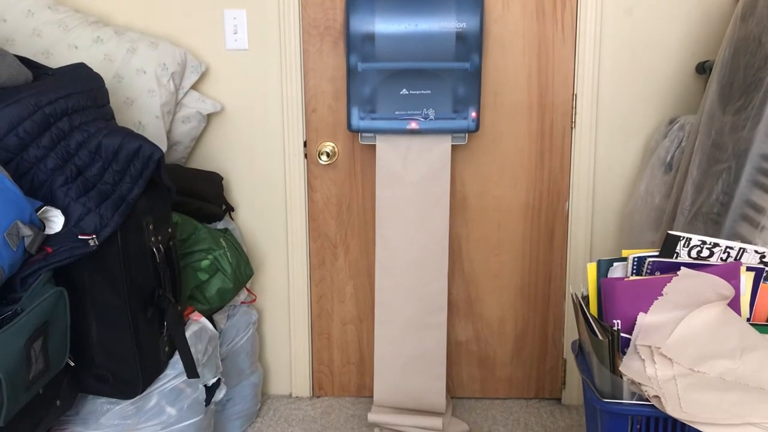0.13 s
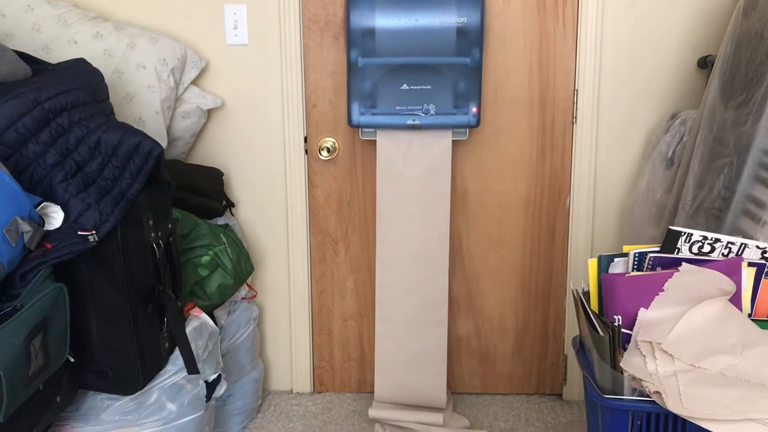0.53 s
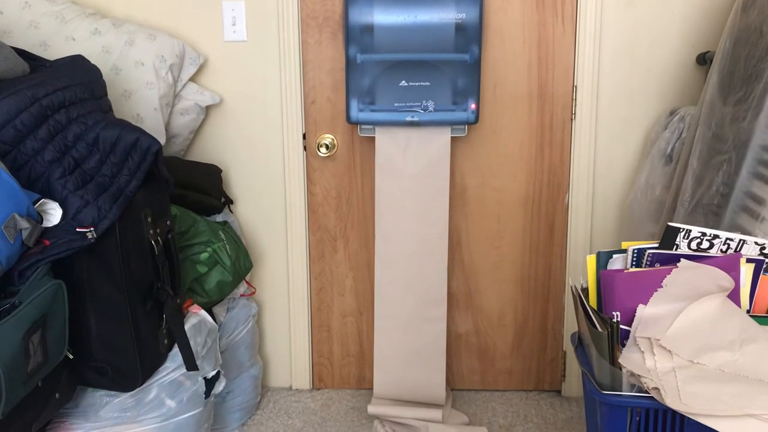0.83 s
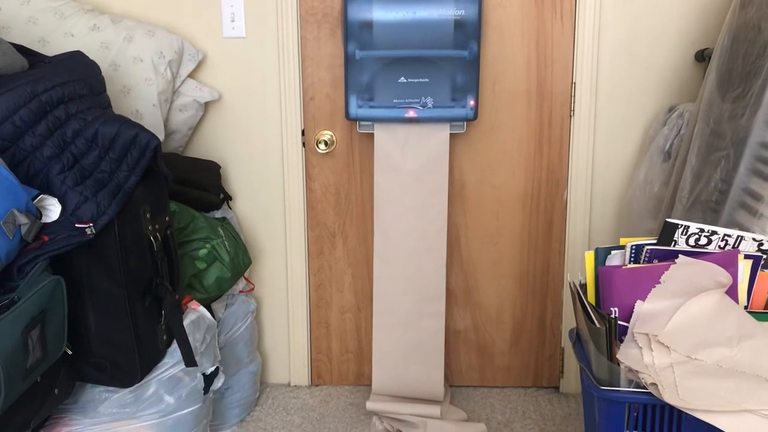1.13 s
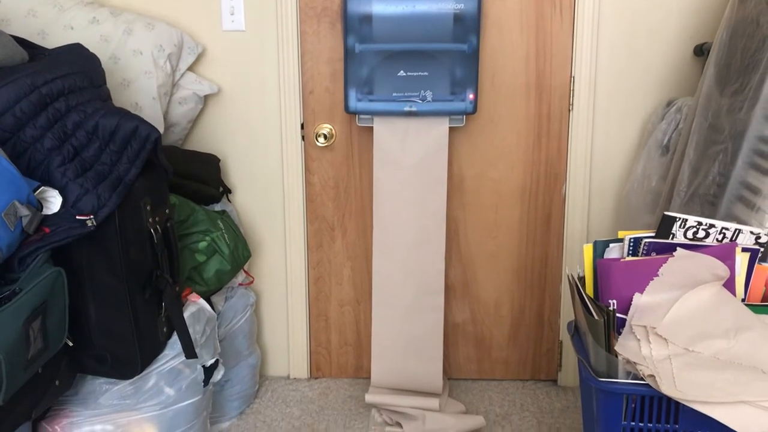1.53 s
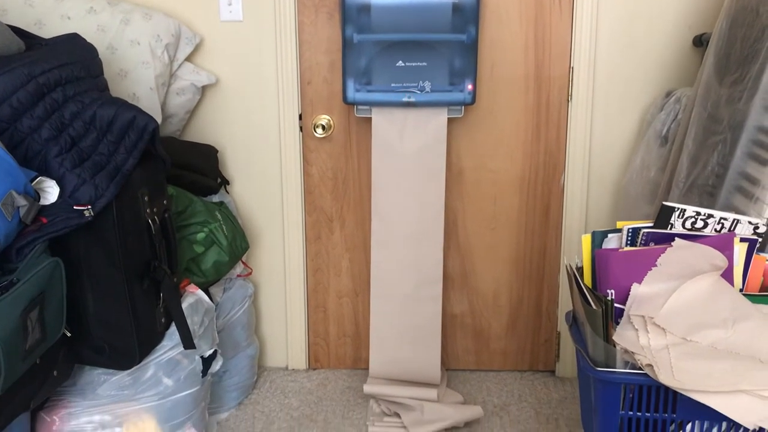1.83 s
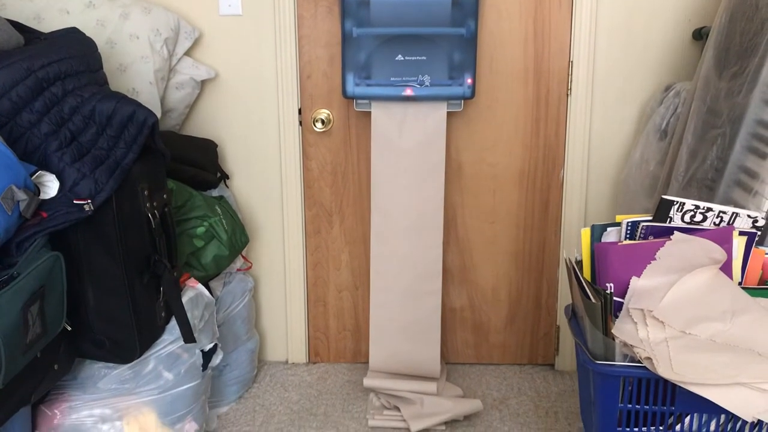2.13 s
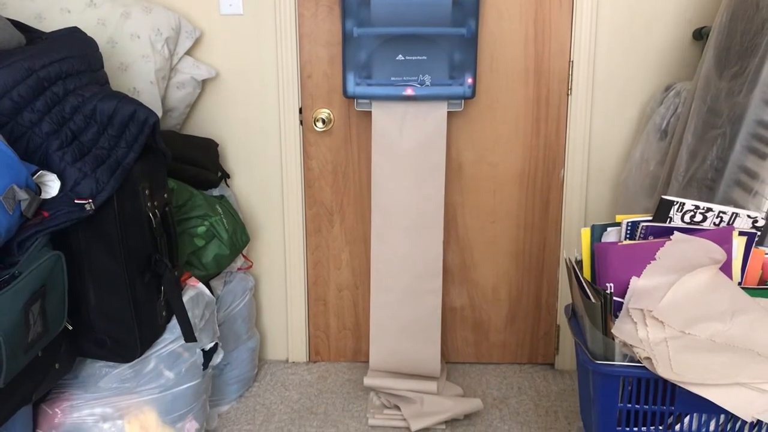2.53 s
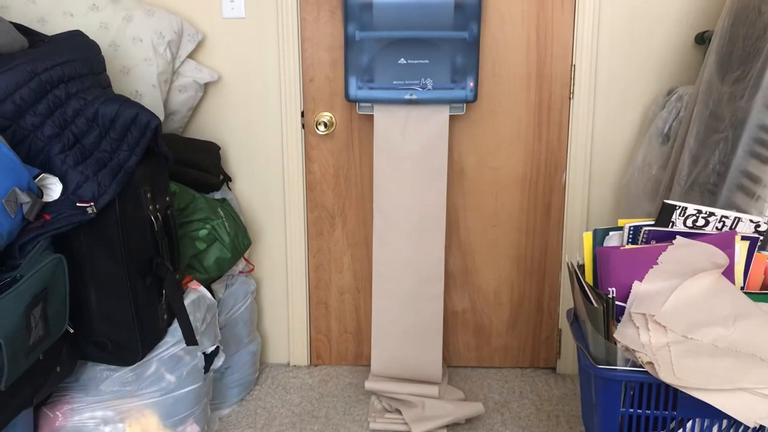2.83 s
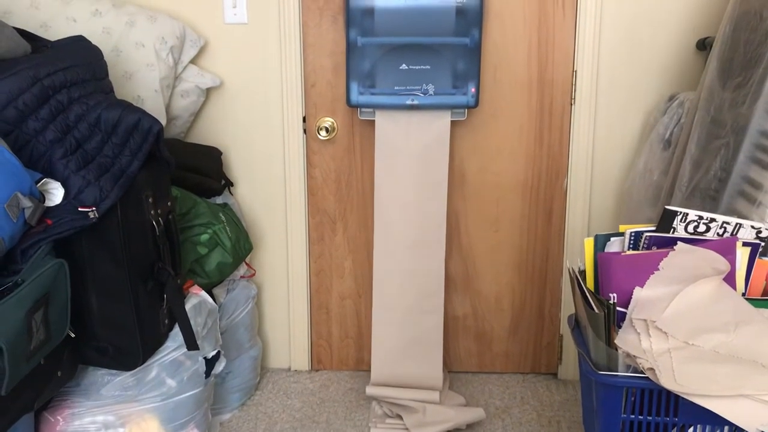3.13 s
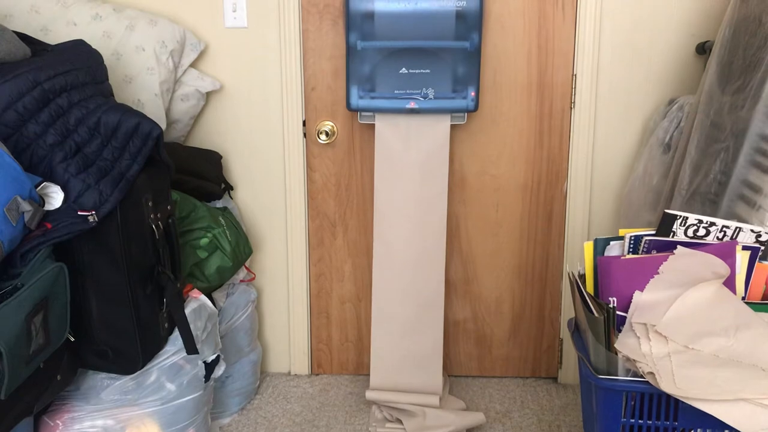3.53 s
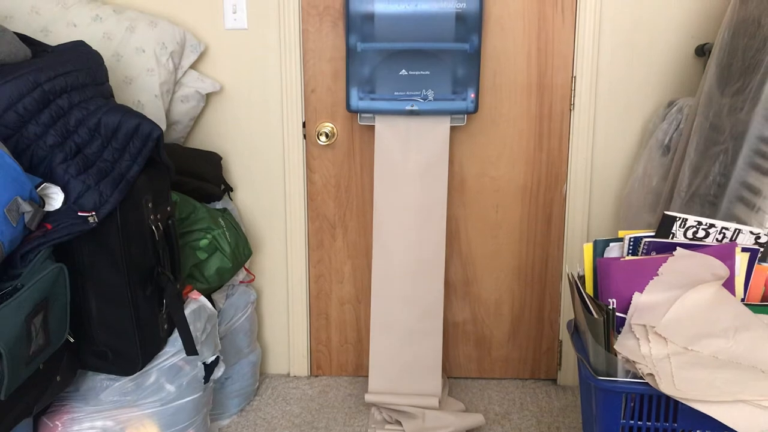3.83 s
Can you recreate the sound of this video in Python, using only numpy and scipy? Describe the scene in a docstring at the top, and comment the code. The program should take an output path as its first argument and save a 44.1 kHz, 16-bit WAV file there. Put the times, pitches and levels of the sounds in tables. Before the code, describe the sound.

A motorized paper towel dispenser whirs to life after a stretch of faint room hiss. Its gears grind and rattle while paper crackles lightly and the plastic case clacks against a door, in a furnished room with little echo.

```python
"""An automatic paper towel dispenser on a wooden door in a quiet bedroom. At first there is only room tone
and a faint mains hum. At 2.6 s the small motor spins up: periodic tooth contact makes the gears whine and
grind, the plastic case resonates, and the shaft hums. From 2.8 s loose gear teeth rattle and the paper
crackles as it feeds. From 3.1 s the roller thumps the door three times and the case clacks. The furnished
room answers each sound with a short, dull reverberation."""
import sys
import numpy as np
from scipy import signal
from scipy.fft import rfft, irfft, next_fast_len
from scipy.io import wavfile
from scipy.ndimage import map_coordinates

SR = 44100
rng = np.random.default_rng(int(sys.argv[2]) if len(sys.argv) > 2 else 0)


def persist_wave(psi):
    """Save psi, clipped to +-1, as 16-bit WAV."""
    counts = np.round(np.clip(psi, -1, 1) * 32767).astype(np.int16)
    wavfile.write(sys.argv[1], SR, np.atleast_2d(counts).T)


N = 176400
T = np.arange(N) / SR

# Spectrum of room tone and microphone hiss: frequency_hz, gain_db
AIR_SPECTRUM = [(12, -42), (20, -16), (30, -14), (44, -5), (60, 0), (78, -4.5), (98, -3), (115, -11.5),
                (149, -5.5), (259, -12), (320, -12.5), (430, -19), (687, -22), (2000, -28), (4500, -32),
                (8000, -35), (17000, -36.5)]
# Loudness of the gear train, grinding and whine together: time_s, level_db
GEAR_LEVELS = [(2.62, -72), (2.67, -66), (2.708, -48), (2.73, -51.5), (2.76, -46), (2.9, -46.5),
               (3.05, -47), (3.12, -45.5), (3.25, -44.5), (3.3, -47), (3.42, -45), (3.6, -46.5),
               (3.75, -45), (3.9, -45.5), (4, -46)]
# Tooth rate and whine harmonics relative to the gear level:
# time_s, tooth_hz, first_db, second_db, third_db, fourth_db
GEAR_MESH = [(2.62, 330, -31, -20, -27, -25), (2.72, 369, -20, -9.5, -15, -24),
             (2.8, 404.4, -19, -4, -7, -7), (2.9, 422.7, -13, -10, -15, -6),
             (2.98, 434.8, -18, -2, -23, -7.5), (3.07, 441, -21.5, -11, -11, -6),
             (3.2, 444.3, -23, -14, -25, -7.5), (3.28, 438.4, -5, -10, -30, -8),
             (3.35, 441, -47, -10, -19.5, -10), (3.43, 444.5, -9, -20, -13.5, -5),
             (3.49, 428.3, -10, -23, -14, -18), (3.55, 420.5, -15, -3.5, -16, -11),
             (3.65, 415.8, -16, -15, -18, -13), (3.75, 426.2, -12, -15, -10.5, -14),
             (3.87, 435.7, -8, -6, -18, -3.5), (3.94, 432.7, -11, -18, -12.5, -13),
             (4, 437.3, -21, -18, -13, -8)]
# Loudness of the shaft hum: time_s, level_db
SHAFT_LEVELS = [(2.66, -84), (2.7, -64), (2.786, -59), (2.838, -48.5), (2.98, -49.5), (3.036, -68),
                (3.13, -51), (3.182, -75), (3.234, -58.5), (3.428, -51.5), (3.626, -58), (3.682, -71),
                (3.86, -55.5), (4.0, -59)]
# Broad response of the plastic case: frequency_hz, gain_db
CASE_SPECTRUM = [(120, -6), (200, -10), (364, -9), (504, -9), (843, -3.5), (930, -6), (1020, 1), (1230, -6),
                 (1700, -1), (2440, -8.5), (3100, -11), (3400, -16), (5500, -22), (6500, -28), (9500, -31),
                 (11500, -40), (17000, -40)]
# Resonances of the case, and one dip: centre_hz, width_hz, gain_db
CASE_MODES = [(300, 40, 5.5), (439, 22, 8), (651, 38, 5.5), (723, 26, 6), (1009, 36, 4), (1136, 36, 5),
              (1287, 91, 5), (1400, 20, 2), (1538, 22, 3), (1640, 66, 3.5), (1800, 47, 1.5), (2130, 42, 4),
              (2350, 55, 3), (2720, 69, 2.5), (2967, 156, 6.5), (4080, 100, 5.5), (4450, 83, 5.5),
              (5260, 99, 3), (5520, 91, -4), (6230, 69, 1), (6930, 90, 5), (8170, 150, 7)]
# Impacts of loose gear teeth: start_s, level_db
GEAR_RATTLES = [(2.7854, -65), (2.8026, -47.5), (2.9452, -50), (3.0145, -49.5), (3.0874, -52.5),
                (3.0984, -44.5), (3.252, -48.5), (3.2907, -51.5), (3.3164, -50), (3.3624, -50.5),
                (3.4154, -50), (3.5145, -58), (3.5471, -43.5), (3.63, -48), (3.6516, -50.5), (3.713, -44),
                (3.7823, -57), (3.8152, -54), (3.875, -41), (3.9092, -51.5), (3.935, -49.5)]
# Spectrum of those impacts: frequency_hz, gain_db
RATTLE_SPECTRUM = [(2000, -25), (3500, -2), (4400, -6), (4950, -0.5), (5350, -0.5), (5700, -4),
                   (6100, -5.5), (7000, -11), (9500, -23.5), (11000, -48)]
# Creases in the sheet: start_s, level_db, t60_s, bright_fraction
PAPER_CREASES = [(2.803, -58, .05, 0.2), (2.868, -64, 0.066, 0.2), (3.102, -56.5, 0.066, 0.3),
                 (3.165, -56.5, 0.058, 0.5), (3.176, -60, 0.046, 0), (3.44, -66, 0.061, .5),
                 (3.574, -57.5, 0.054, .2), (3.631, -64, .055, .2), (3.952, -56, .06, 0.22),
                 (3.963, -62, 0.063, 0.7)]
# Spectrum of the dull part of a crackle: frequency_hz, gain_db
DULL_SPECTRUM = [(6000, -30), (7500, 3), (9000, 3.5), (10300, -3), (12000, -7), (13500, -20), (16500, -18)]
# Spectrum of the bright part of a crackle: frequency_hz, gain_db
BRIGHT_SPECTRUM = [(10000, -30), (12500, -2), (14500, -4), (16500, -4)]
# Blows of the roller on the door: start_s, door_level_db, pitch_hz, clack_level_db
ROLLER_BLOWS = [(3.111, -54, 104.3, -46), (3.636, -52, 102.2, -40.5), (3.688, -58, 85.9, -53)]
# Dips in the microphone's response: centre_hz, width_hz, depth_db
MICROPHONE_DIPS = [(4990, 280, 4.5), (7700, 500, 2.5), (10350, 1150, 5)]


def amp(db):
    """Decibels as an amplitude ratio."""
    return 10 ** (np.asarray(db) / 20)


def unit_rms(x):
    """Normalisation to unit mean power."""
    return x / np.sqrt(np.mean(x ** 2) + 1e-20)


def curves(rows):
    """Linear interpolation in time: one value per sample for each later column."""
    times_s, *columns = np.transpose(rows)
    return [np.interp(T, times_s, column) for column in columns]


def wobble(rate_hz):
    """Smooth random modulation: a spline through rate_hz knots a second, at most 60."""
    knots = rng.standard_normal(int(N * 60 / SR) + 4)
    return map_coordinates(knots, [T * rate_hz])


def filtered(x, response):
    """Linear filtering: the spectrum is multiplied by a frequency response."""
    size = next_fast_len(N + SR // 2)
    hz = np.fft.rfftfreq(size, 1 / SR)
    return irfft(rfft(x, size) * response(hz), size)[:N]


def colour(spectrum):
    """Frequency response interpolated on logarithmic axes, closed outside the given points."""
    points_hz, db = np.transpose(spectrum)
    return lambda hz: amp(np.interp(np.log(hz + 1), np.log(points_hz + 1), db, left=-120, right=-120))


def noise(response):
    """Coloured Gaussian noise of unit power."""
    return unit_rms(filtered(rng.standard_normal(N), response))


def bursts(rows, rise_s):
    """Envelope of smooth onsets and exponential decays, from rows of start_s, level_db, t60_s."""
    envelope = np.zeros(N)
    for start_s, db, t60_s in rows:
        age_s = np.maximum(T - start_s + rise_s / 2, 0)
        rise = np.sin(np.pi / 2 * np.minimum(age_s / rise_s, 1)) ** 2
        envelope += amp(db - 60 * age_s / t60_s) * rise
    return envelope


def room_tone(mains_hz=58.2):
    """Noise floor: steady broadband noise plus a mains hum drifting in level and phase."""
    hum = amp(-78.5 + 3.3 * wobble(5)) * np.sin(2 * np.pi * (mains_hz * T + 0.073 * wobble(4.2)))
    return amp(-65.5) * noise(colour(AIR_SPECTRUM)) + hum


def case_response(hz):
    """Resonance: the modes of the plastic case add narrow peaks to its broad response."""
    modes_db = sum(db / (1 + (2 * (hz - centre) / width) ** 2) for centre, width, db in CASE_MODES)
    return colour(CASE_SPECTRUM)(hz) * amp(modes_db)


def gear_grinding(tooth_cycles, running_s, depth=0.16, treble_hz=2270, treble_rise_s=0.098):
    """Amplitude modulation: tooth contacts chop noise that the case filters. The treble enters late."""
    contact = 1 + depth * np.cos(2 * np.pi * tooth_cycles)
    grinding = unit_rms(filtered(contact * rng.standard_normal(N), case_response))
    grinding *= amp(-1.5 + 0.59 * wobble(14))
    treble = filtered(grinding, lambda hz: 1 / (1 + (treble_hz / (hz + 1)) ** 4))
    return grinding - treble * np.exp(-(running_s / treble_rise_s) ** 2)


def gear_whine(tooth_cycles, harmonics_db, waver_db=1.4, jitter_cycles=0.07):
    """Periodic meshing gives harmonics of the tooth rate, each wavering in level and phase."""
    whine = np.zeros(N)
    for harmonic, db in enumerate(harmonics_db, start=1):
        gain = amp(db + waver_db * wobble(24.94))
        whine += gain * np.sin(2 * np.pi * (harmonic * tooth_cycles + jitter_cycles * wobble(30)))
    return whine


def shaft_hum(tooth_cycles, pitch_ratio=0.424):
    """Rotation gives a wavering tone at a constant fraction of the tooth rate."""
    level_db, = curves(SHAFT_LEVELS)
    gain = amp(level_db + 2.24 * wobble(30))
    return gain * np.sin(2 * np.pi * (pitch_ratio * tooth_cycles + 0.057 * wobble(25.02)))


def motor(start_s=2.614, rise_s=0.023):
    """Rigid coupling: grinding, whine and shaft hum all follow one speed."""
    gear_db, = curves(GEAR_LEVELS)
    tooth_hz, *harmonics_db = curves(GEAR_MESH)
    tooth_cycles = np.cumsum(tooth_hz) / SR
    running_s = np.maximum(T - start_s, 0)
    onset = 1 - np.exp(-running_s / rise_s)
    gears = gear_grinding(tooth_cycles, running_s) + gear_whine(tooth_cycles, harmonics_db)
    return onset * (amp(gear_db) * gears + shaft_hum(tooth_cycles))


def gear_rattles(t60_s=0.092):
    """Backlash: loose gear teeth collide in short, dry bursts of noise."""
    envelope = bursts([(start_s, db - 2, t60_s) for start_s, db in GEAR_RATTLES], rise_s=0.011)
    flicker = amp(2.65 * wobble(60))
    return envelope * flicker * noise(colour(RATTLE_SPECTRUM))


def paper_crackles():
    """Buckling: each crease releases a noise burst, its power shared by a dull and a bright band."""
    start_s, level_db, t60_s, bright = np.transpose(PAPER_CREASES)
    crackles = np.zeros(N)
    for spectrum, share in [(DULL_SPECTRUM, 1 - bright), (BRIGHT_SPECTRUM, bright)]:
        band_db = level_db + 1.5 + 10 * np.log10(np.clip(share, 0.01, 1))
        envelope = bursts(zip(start_s, band_db, t60_s), rise_s=0.0075)
        flicker = amp(2.5 * wobble(60))
        crackles += envelope * flicker * noise(colour(spectrum))
    return crackles


def roller_thumps(door_rise_s=0.0076, door_t60_s=0.18, clack_t60_s=0.1):
    """Impact excitation: each blow rings one damped mode of the door, and the case clacks."""
    door, clacks = np.zeros(N), []
    for start_s, door_db, pitch_hz, clack_db in ROLLER_BLOWS:
        age_s = np.maximum(T - start_s, 0)
        envelope = amp(door_db + 9 - 60 * age_s / door_t60_s) * (1 - np.exp(-age_s / door_rise_s))
        door += envelope * np.sin(2 * np.pi * pitch_hz * age_s)
        clacks.append((start_s - 0.004, clack_db, clack_t60_s))
    return door + bursts(clacks, rise_s=0.0028) * noise(case_response)


def reverberation(direct, t60_s=0.36, gap_s=0.006, low_cut_hz=290, high_cut_hz=4100):
    """Diffuse field: convolution with decaying noise stands for the room's many dull reflections."""
    delay_s = T[:SR // 2]
    tail = rng.standard_normal(len(delay_s)) * amp(-60 * delay_s / t60_s) * (delay_s > gap_s)
    wet = signal.fftconvolve(direct, tail / np.linalg.norm(tail))[:N]
    return filtered(wet, lambda hz: 1 / (1 + 1j * hz / high_cut_hz) / (1 - 1j * low_cut_hz / (hz + 1)))


def scene():
    """Superposition of the dispenser's direct sound, its reverberation and the room tone."""
    direct = motor() + gear_rattles() + paper_crackles() + roller_thumps()
    return (direct + amp(-5) * reverberation(direct) + room_tone())[None]


def record(dry):
    """Transducer response: the microphone has three dips and passes nothing above its band limit."""
    def response(hz, limit_hz=15760):
        loss_db = sum(db * np.exp(-(2 * (hz - centre) / width) ** 2)
                      for centre, width, db in MICROPHONE_DIPS)
        return amp(-loss_db) * (hz < limit_hz)
    return filtered(dry[0], response)[None]


dry = scene()
out = record(dry)
persist_wave(out)
```